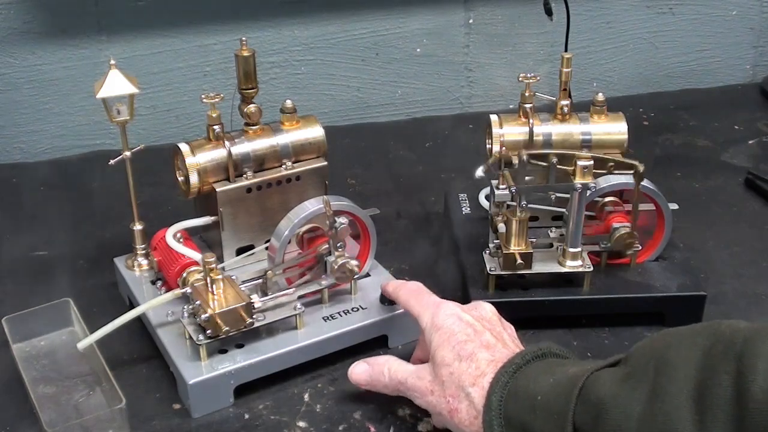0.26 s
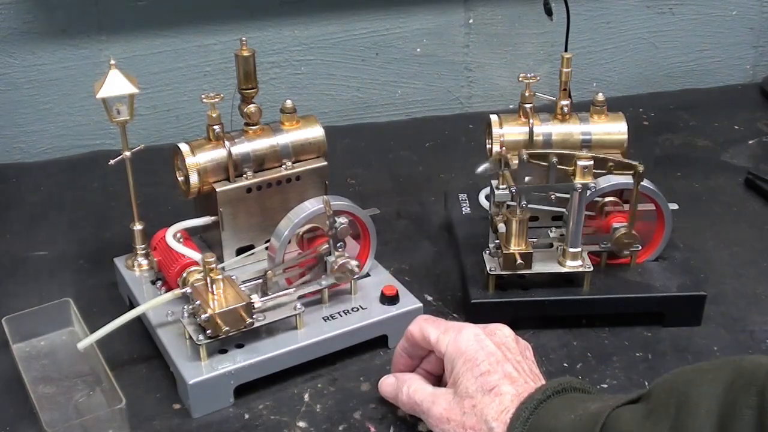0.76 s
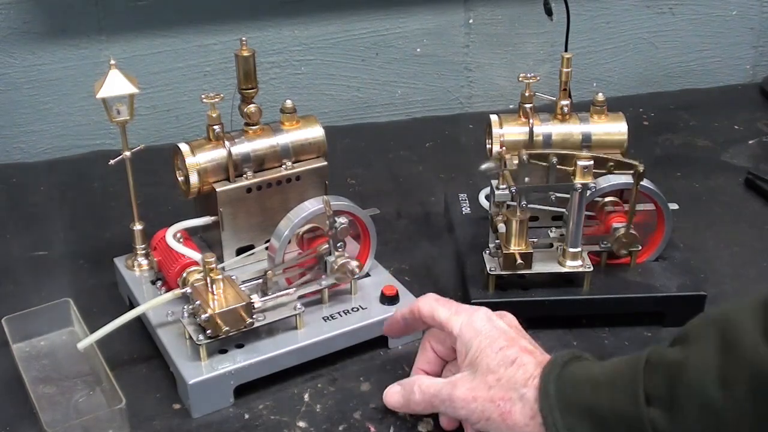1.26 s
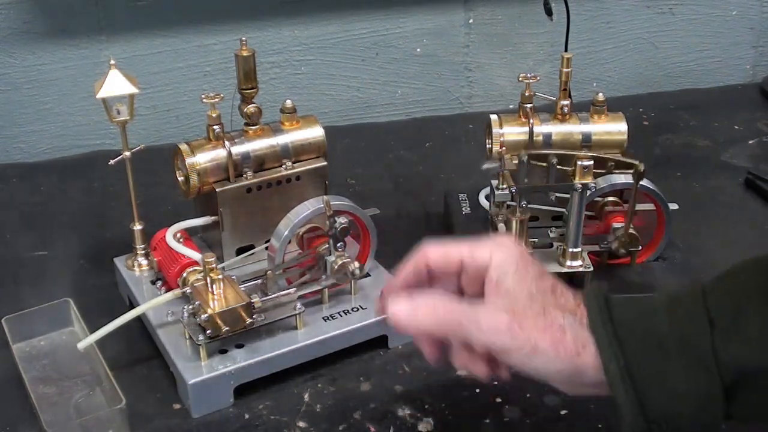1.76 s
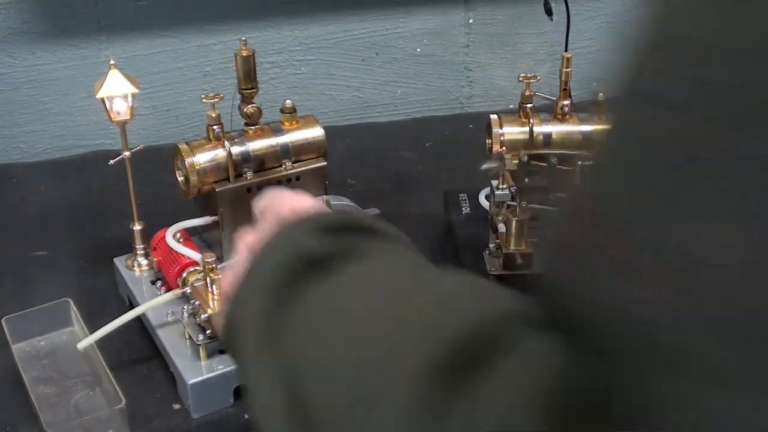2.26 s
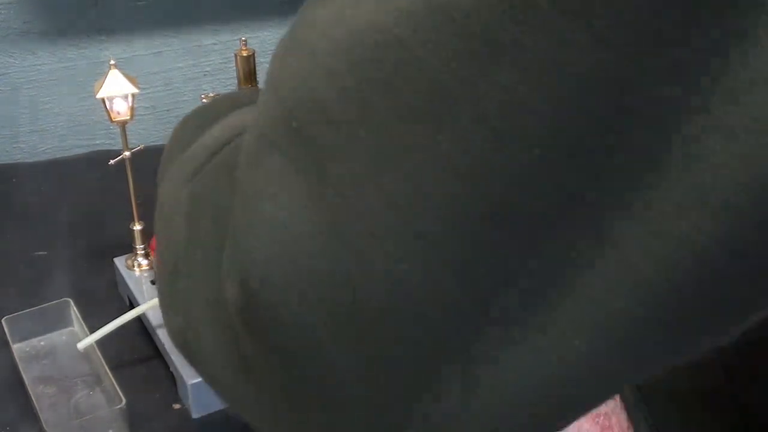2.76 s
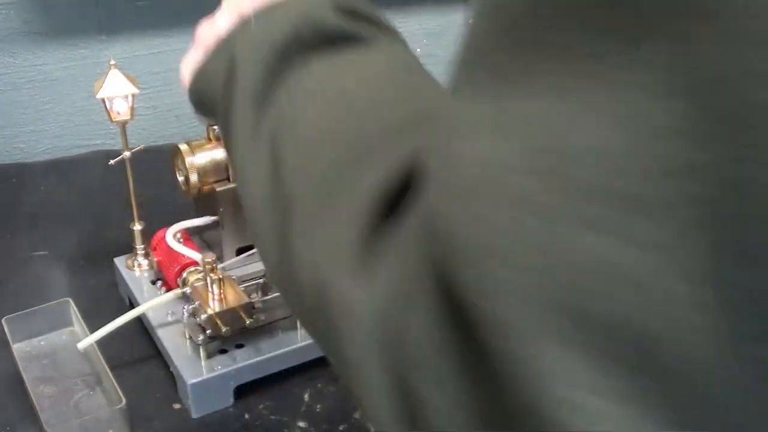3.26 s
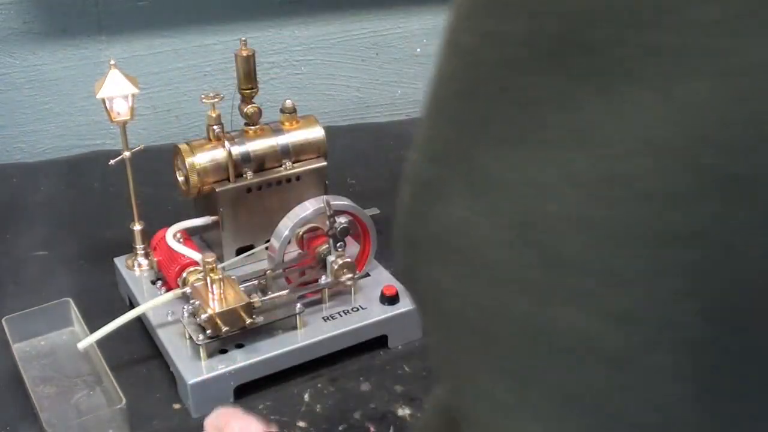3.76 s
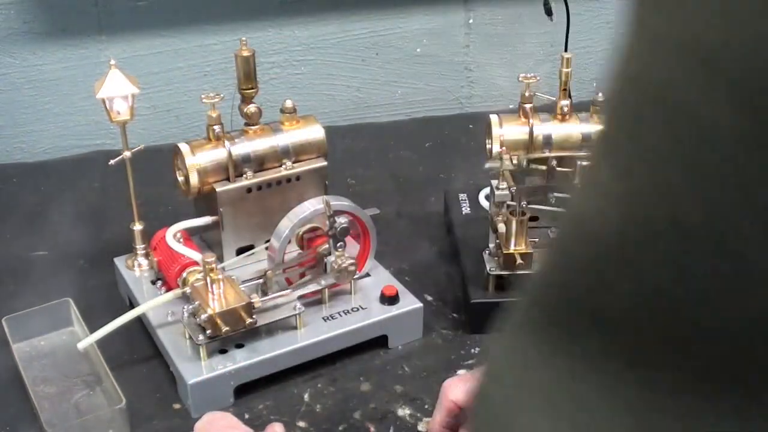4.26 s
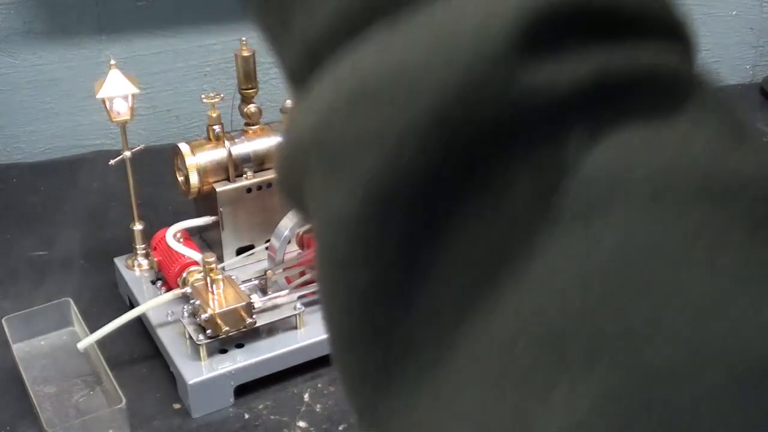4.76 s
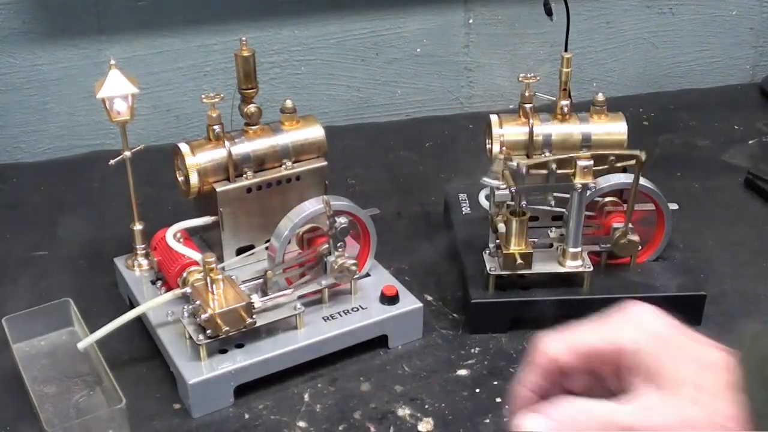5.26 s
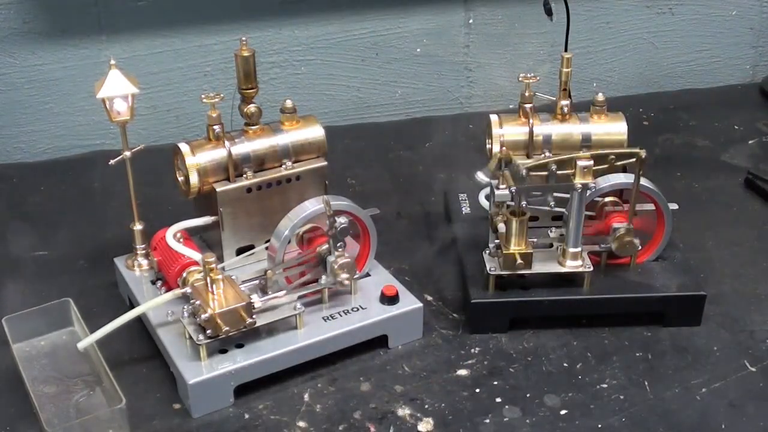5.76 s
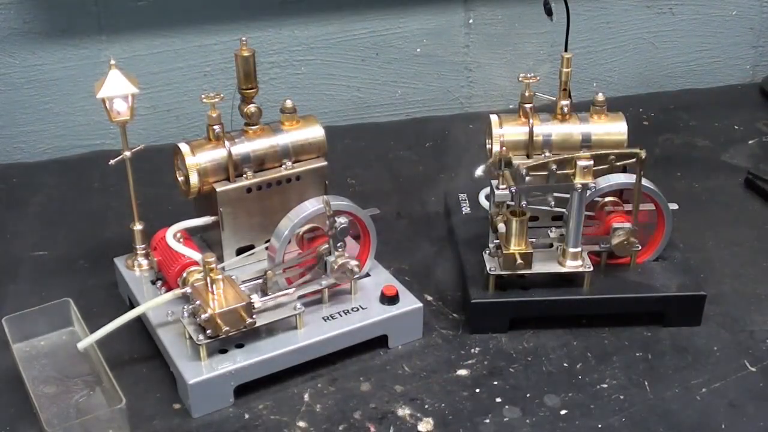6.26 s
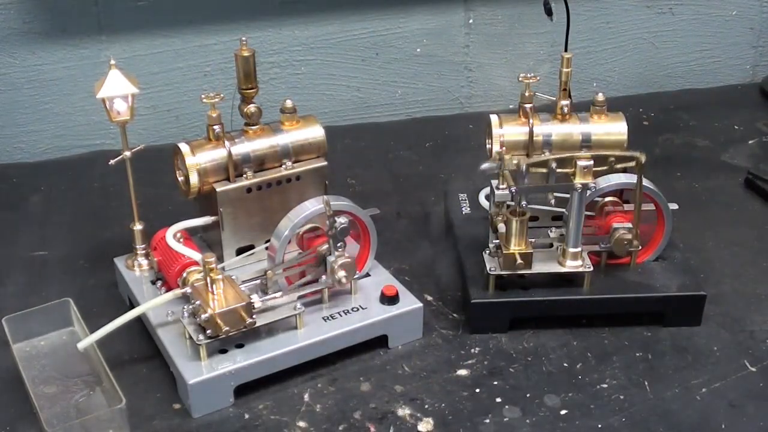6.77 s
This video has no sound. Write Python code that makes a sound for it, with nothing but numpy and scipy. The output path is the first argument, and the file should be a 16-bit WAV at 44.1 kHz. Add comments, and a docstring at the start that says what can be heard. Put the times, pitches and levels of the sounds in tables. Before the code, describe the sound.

Two model steam engines run on a bench in a small workshop, heard close up. One beats quickly and evenly with hollow exhaust puffs, metallic clicks and little thumps, slowing slightly after about two seconds. The other adds a soft, fluttering whirr, and the boilers hiss faintly. A brief spurt of steam comes early, a few stray knocks and clicks fall along the way, and a tiny squeak sounds near the end.

```python
"""Knocks, puffs and thumps repeat over a soft whirr and hiss: two model steam engines, close by on a workbench.
The beam engine slows from eight turns a second to seven; its slack joints excite the modes of linkage and
bench, and each release of steam rings its chimney. The other engine whirrs, swelling with each stroke.
Turbulent leaks make the boilers hiss, things click or get bumped now and then, and an arm reaching across
casts an acoustic shadow in the treble. The small workshop adds brief reflections."""
import sys
import numpy as np
from scipy import signal
from scipy.fft import rfft, irfft
from scipy.io import wavfile

SR = 44100
rng = np.random.default_rng(int(sys.argv[2]) if len(sys.argv) > 2 else 0)


def to_wav(s):
    """Save 16-bit WAV."""
    ch = np.atleast_2d(s).T  # columns
    pcm = np.round(np.clip(ch, -1, 1) * 32767)  # PCM
    wavfile.write(sys.argv[1], SR, pcm.astype(np.int16))


N = 309582
TIME = np.arange(N) / SR
TAIL = TIME[:SR // 4]

# modes of beam, rods and flywheel: frequency_hz, t60_s, level_db
LINKAGE_MODES = [(1382, 0.086, -3.5), (1492, 0.043, -0.5), (1606, 0.055, 5), (1667, 0.058, -2.5),
                 (1805, 0.046, -10), (1883, 0.056, 2.5), (1967, 0.083, 0), (2160, 0.038, -0.5),
                 (2305, 0.037, -7), (2336, 0.14, -5.5), (3000, 0.036, 0.5), (3200, 0.061, -1),
                 (3400, 0.044, -2), (4047, 0.12, -10), (4697, .035, -5.5)]
# modes of the base plate on the bench top: frequency_hz, t60_s, level_db
BENCH_MODES = [(123.7, 0.15, -10), (144, 0.14, -7), (214, 0.18, -7.5), (245, 0.2, -5), (285.4, 0.18, 2.5),
               (323.7, 0.25, -6.5), (382.6, 0.24, -4), (443, 0.15, -5), (479.3, 0.15, -5.5),
               (607, 0.23, -12)]
# spectrum of a steam jet: frequency_hz, density_db
STEAM_SPECTRUM = [(300, -20.5), (900, 2), (2200, 0), (2700, -4.5), (3200, -2), (4800, -4.5), (6500, -10.5),
                  (9000, -10), (12500, -15.5), (16000, -30)]


def undb(db):
    """Amplitude ratio of a level in decibels."""
    return 10 ** (np.asarray(db) / 20)


def unit(response):
    """Normalisation to unit energy."""
    return response / np.sqrt(np.sum(response ** 2))


def through(x, response):
    """Convolution of a signal with an impulse response."""
    return signal.oaconvolve(x, response)[:N]


def curve(points, t=TIME):
    """Linear interpolation between (time, value) points."""
    return np.interp(t, *np.transpose(points))


def fade(t60):
    """Exponential decay of 60 dB in t60 seconds."""
    return np.exp(-np.log(1000) * TAIL / t60)


def modes(table):
    """Superposition of damped modes; alternating signs make the ring take a moment to build."""
    return unit(sum((-1) ** k * undb(db) * fade(t60) * np.sin(2 * np.pi * hz * TAIL)
                    for k, (hz, t60, db) in enumerate(table)))


def colour(points, size=4096):
    """Minimum-phase response with the given spectrum, by folding the cepstrum."""
    hz, db = np.transpose(points)
    bin_hz = np.arange(size // 2 + 1) * SR / size
    gain = undb(np.interp(np.log(bin_hz + 1), np.log(hz), db))
    cepstrum = irfft(np.log(gain))
    cepstrum[1:size // 2] *= 2
    cepstrum[size // 2 + 1:] = 0
    return unit(irfft(np.exp(rfft(cepstrum))))


def noise():
    """White Gaussian noise."""
    return rng.standard_normal(N)


def walk(rate_hz):
    """Interpolated random fluctuation with a spread near 1."""
    return np.interp(TIME * rate_hz, np.arange(N), noise())


def blows(times, db, rough=0., chatter_s=.002):
    """Impulsive excitation; roughness spreads each impact's energy over a chatter of small contacts."""
    out = np.zeros(N)
    shape = np.exp(-TAIL[:SR // 20] / chatter_s)
    for s, gain in zip(times, undb(db)):
        push = rough * unit(shape * rng.standard_normal(len(shape)))
        push[0] += 1
        at = int(s * SR) + np.arange(len(push))
        inside = (at >= 0) & (at < N)
        out[at[inside]] += gain * unit(push)[inside]
    return out


def puffs(times, db, open_s, hold_s, decay_s):
    """Turbulent noise follows the flow: the port opens, holds briefly, and the pressure drains."""
    flow = (1 - np.exp(-TAIL / open_s)) * np.exp(-np.maximum(TAIL - hold_s, 0) / decay_s)
    return through(blows(np.maximum(times, 0), db), flow) * noise()


def pops(times, db, start_hz, end_hz, length_s, skew, scatter):
    """Cavity resonance: gargling pops whose pitch falls as the steam pocket in the pipe grows."""
    out = np.zeros(N + SR)
    gargle = 1 + .45 * (walk(650) + 1j * walk(650))
    for s, gain, (detune, stretch) in zip(times, undb(db), rng.standard_normal((len(times), 2))):
        progress = np.linspace(0, 1, int(SR * length_s * np.exp(0.16 * stretch)))
        hz = start_hz * (end_hz / start_hz) ** progress * (1 + scatter * detune)
        at = max(int(s * SR), 0)
        swing = np.exp(2j * np.pi * np.cumsum(hz) / SR)
        swing *= gargle.take(at + np.arange(len(hz)), mode="clip")
        envelope = np.sin(np.pi * progress ** skew)
        out[at:at + len(hz)] += gain * unit(envelope * swing.imag) * (s > 0)
    return out[:N]


def snap(s, db, centre_hz, width_hz, decay_s):
    """A band-limited transient: bright noise that dies within milliseconds."""
    burst = (TIME >= s) * np.exp(-np.abs(TIME - s) / decay_s) * noise()
    softened = signal.sosfilt(signal.butter(4, 13500, fs=SR, output="sos"), burst)
    band = signal.iirpeak(centre_hz, centre_hz / width_hz, fs=SR)
    return undb(db) * np.sqrt(SR / 2 / width_hz) * signal.lfilter(*band, softened)


def rumble():
    """Low room noise; a deep part in antiphase makes the two ears differ."""
    # workshop background: frequency_hz, density_db
    spectrum = [(20, -9), (40, -16), (55, 2), (70, 3), (85, -4), (120, -24), (400, -47)]
    common = undb(-71.5) * through(noise(), colour(spectrum, size=16384))
    deep = undb(-83) * through(noise(), colour([(20, 0), (45, -6), (200, -40)], size=16384))
    return np.array([common + deep, common - deep])


def workshop(x, t60=0.22, build_s=0.0039):
    """Diffuse reverberation of a cluttered room, thinner and duller than the direct sound."""
    tail = rng.standard_normal(len(TAIL)) * fade(t60) * (1 - np.exp(-TAIL / build_s))
    return through(signal.lfilter(*signal.butter(1, [500, 7000], "band", fs=SR), x), unit(tail))


def early_reflections(x, t60=0.048):
    """Scattering off the boilers and the bench gives a very short tail."""
    return through(x, unit(rng.standard_normal(len(TAIL)) * fade(t60)))


def direct_path(x, shadow_hz=9500, bass_hz=100):
    """An arm's acoustic shadow varies the treble, and such small bodies radiate almost no bass."""
    # treble gain as the arm moves: time_s, gain_db
    shadow = [(2.2, 2), (2.42, -2.5), (3.15, -2), (3.6, 3.5), (4.5, 3.5), (4.75, 0), (5.05, 4)]
    low = signal.sosfiltfilt(signal.butter(5, shadow_hz, fs=SR, output="sos"), x)
    shaded = low + (x - low) * undb(curve(shadow))
    return signal.sosfilt(signal.butter(8, bass_hz, "high", fs=SR, output="sos"), shaded)


def mill_engine(turn_hz=24, throb_db=2.0):
    """Amplitude modulation: the whirr of the fast, light horizontal engine swells with each stroke."""
    # running noise: frequency_hz, density_db
    whirr = [(80, -14.5), (110, 2.5), (200, 2.5), (290, 10.5), (430, 0.5), (580, -4), (900, 1.5),
             (1700, -7.5), (2700, -10), (3300, -6), (6000, -12.5), (12000, -42)]
    turns = np.cumsum(turn_hz * (1 + 0.024 * walk(1.88))) / SR
    running = noise() * undb(throb_db * np.cos(2 * np.pi * turns) + 0.5 * walk(40))
    return undb(-43) * through(running, colour(whirr)) + undb(-57) * through(running, modes(LINKAGE_MODES))


def boilers():
    """Jet noise: leaking steam sizzles, and once a gush of wet steam joins it."""
    # strength of the leak: time_s, relative_level_db
    leak = [(0, -40.5), (1.4, -37.5), (2.1, -37.5), (2.5, -40), (4.1, -40.5), (4.85, -39), (5.16, -37.5),
            (7.02, -37.5)]
    # spectrum of the leak: frequency_hz, density_db
    hiss_spectrum = [(2500, -1), (4500, -9.5), (6300, -7.5), (7700, 1.5), (8900, 1.5), (9600, 0),
                     (10900, 3), (12200, -6), (14000, -11.5), (16000, -16)]
    # a gush of wet steam: time_s, level_db
    gush_levels = [(1.34, -45), (1.37, -35.5), (1.44, -33.5), (1.49, -43), (1.54, -68)]
    hiss_db = curve(leak) + 0.55 * walk(25) + 0.93 * walk(600) - 3.0
    hiss = through(noise() * undb(hiss_db), colour(hiss_spectrum))
    gush = through(noise() * undb(curve(gush_levels)), colour(STEAM_SPECTRUM))
    return hiss + gush


def stray_clicks():
    """Noise transients: two short bright clicks, the first probably a switch being released."""
    # the clicks: start_s, level_db, centre_hz, width_hz, decay_s
    clicks = [(.288, -25, 7250, 4940, 0.004), (5.604, -23, 13500, 2400, 0.0016)]
    return sum(snap(*click) for click in clicks)


def squeak():
    """Friction makes a dry bearing sing for a moment."""
    # course of the squeak: time_s, pitch_hz, level_db
    glide = [(6.821, 6460, -65), (6.858, 6430, -50), (6.88, 6080, -47), (6.932, 6030, -45),
             (6.98, 5900, -58)]
    s, hz, db = np.transpose(glide)
    cycles = np.cumsum(np.interp(TIME, s, hz) * (1 + 0.0092 * walk(220))) / SR
    envelope = undb(np.interp(TIME, s, db) + 2 * walk(60)) * (TIME > s[0]) * (TIME < s[-1])
    return envelope * np.sin(2 * np.pi * cycles)


def bumps():
    """Stray impacts snap at the contact and set bench, metalwork and base plates in free vibration."""
    # knocks on bench and frames: start_s, thump_db, ring_db, clack_db, snap_db, snap_hz
    knocks = [(0.115, -28, -4, -16, -23.5, 7200), (1.309, -12, -9, -1.5, -22, 4040),
              (1.919, -1, -24, -11, -24, 7200), (1.938, -3, -30, -17, -50, 4000),
              (3.816, -6, -27, -3, -48, 4000), (5.1, -4.5, -6, -8, -22.5, 3500),
              (6.88, -32, -4.5, -10.5, -25.5, 3970)]
    # dull clack of a base plate: frequency_hz, density_db
    clack_spectrum = [(200, -20), (420, 0), (900, 5), (2200, -10), (3500, -23), (5500, -10), (9000, -14),
                      (16000, -45)]
    s, thump_db, ring_db, clack_db, snap_db, snap_hz = np.transpose(knocks)
    thump = through(blows(s, thump_db, rough=0.26, chatter_s=0.0053), modes(BENCH_MODES))
    ring = through(blows(s, ring_db, rough=0.86, chatter_s=0.003), modes(LINKAGE_MODES))
    contact = sum(snap(*hit, width_hz=8900, decay_s=0.0058) for hit in zip(s, snap_db, snap_hz))
    clack = through(blows(s, clack_db, rough=7.5, chatter_s=0.0095), colour(clack_spectrum))
    return contact + thump + ring + clack


def gulp():
    """Cavity resonance: a slug of condensed water glugs in the exhaust pipe."""
    # the slug: start_s, level_db
    slugs = [(3.814, -5.5)]
    s, db = np.transpose(slugs)
    return pops(s, db, start_hz=677, end_hz=354, length_s=0.0237, skew=1.3, scatter=.01)


def flywheel(first_turn_s=-0.0165):
    """Speed integrates to rotation: each turn gets a start time and knock, exhaust and click drives."""
    # speed of the beam engine: time_s, turns_per_s
    speed = [(0.0, 8.014), (1.8, 7.9162), (2.4, 7.4291), (2.6, 7.4169), (3.2, 7.0725), (4.4, 6.9549),
             (4.6, 6.9755), (7.02, 6.8644)]
    # how hard it works: time_s, force_db, click_db
    effort = [(0, -2, -8.5), (.36, -5.5, -.5), (.75, 2.3, 1), (1.35, 2.5, 4), (1.6, 0, 1.5), (2.12, 3, 3),
              (2.5, -1.7, -1), (3.6, 0.3, -4.5), (3.92, -3, -4.5), (4.6, 1.2, -2), (5.22, -.3, -.5),
              (5.9, 2, 1.5), (6.95, -5.5, 0)]
    t = first_turn_s + TIME
    turns = np.cumsum(curve(speed, t)) / SR
    s = np.interp(np.arange(turns[-1]), turns, t)
    when, force_db, click_db = np.transpose(effort)
    stroke_db = np.interp(s, when, force_db)
    # no two strokes are alike
    knock_jitter, exhaust_jitter, click_jitter = rng.standard_normal((len(s), 3)).T
    knock_db = 1.1 + 1.05 * stroke_db + 1.5 * knock_jitter
    exhaust_db = -1.42 + 0.53 * stroke_db + 0.47 * exhaust_jitter
    return s, knock_db, exhaust_db, np.interp(s, when, click_db) + 0.1 * click_jitter


def valve(beats):
    """The slide valve's high modes are struck at each reversal and blown by steam on both strokes."""
    # modes of the small valve gear: frequency_hz, t60_s, level_db
    gear_modes = [(6750, 0.024, -3), (7700, 0.02, 5.5), (8460, 0.075, -1), (8900, 0.05, 4),
                  (9040, 0.035, 1), (12900, .03, -10), (12800, .012, -4)]
    return_modes = [(7430, 0.0031, 0), (8250, .003, -1), (8920, 0.0064, 0)]
    s, _, _, click_db = beats
    return_s = s + .53 * np.gradient(s)
    return_tick = blows(return_s, 0.47 * click_db - 13.0, rough=2.3, chatter_s=0.0022)
    ticks = blows(s, click_db - 14, rough=0.99, chatter_s=0.003) + 0.45 * return_tick
    strokes = np.concatenate([s, return_s])
    leak = puffs(strokes, np.full(len(strokes), -49), open_s=0.016, hold_s=0.0086, decay_s=0.027)
    return through(ticks + leak, modes(gear_modes)) + through(return_tick, modes(return_modes))


def crack(beats):
    """Sudden pressure release: each chuff starts with a short crack as the exhaust port opens."""
    # first crack of steam: frequency_hz, density_db
    spectrum = [(1000, -33), (3000, 5), (5000, 4), (6500, -9), (9000, -2), (11000, -1.5), (13200, -3),
                (14500, -12), (16000, -15)]
    s, _, _, click_db = beats
    release = blows(s + .0012, 1.34 * click_db - 13.0, rough=3.4, chatter_s=0.0024)
    return through(release, colour(spectrum))


def exhaust(beats):
    """Pipe resonance: one chuff a turn, a bright pop sinking to a hollow one; the return stroke sighs."""
    # modes of exhaust pipe and chimney: frequency_hz, t60_s, level_db
    chimney_modes = [(660, 0.022, -9), (854.6, 0.074, -1.8), (900, 0.041, -3.5), (964, 0.081, -8),
                     (1143.7, 0.075, 0.5), (1206, 0.022, -2), (1343, 0.041, -11), (1446, 0.029, -3.5),
                     (1606, 0.049, -4), (1977, 0.035, -6.5)]
    s, knock_db, exhaust_db, click_db = beats
    turn_s = np.gradient(s)
    pop = pops(s - .0035, knock_db - 4.5, 1680, 1573, length_s=0.012, skew=1.25, scatter=0.022)
    pop += pops(s + 0.004055, exhaust_db - 5.5, 1160, 1139, length_s=0.031, skew=0.35, scatter=0.02)
    pop += pops(s + .015, exhaust_db - 8, 937, 828, length_s=0.017, skew=0.33, scatter=0.045)
    chuff = puffs(s, exhaust_db, open_s=0.0021, hold_s=0.014, decay_s=0.019)
    sigh = puffs(s + 0.499 * turn_s, exhaust_db, open_s=0.0017, hold_s=0.011, decay_s=0.0027)
    surge = blows(s + 0.004006, exhaust_db - 4.5, rough=0.48, chatter_s=0.0055)
    chimney = through(undb(-32.5) * chuff + undb(-37.5) * sigh + surge, modes(chimney_modes))
    jet = puffs(s, 0.46 * click_db, open_s=0.0078, hold_s=0.011, decay_s=0.028)
    steam = through(undb(-33) * jet + undb(-45.0) * sigh, colour(STEAM_SPECTRUM))
    # the barely open port whistles just before the return stroke
    seep = puffs(s + 0.405 * turn_s, .5 * click_db - 44.0, open_s=0.0027, hold_s=0.015, decay_s=0.0036)
    whistle = through(seep, modes([(3310, 0.011, 0)]))
    return pop + chimney + steam + whistle


def clatter(beats):
    """Backlash: slack joints collide several times a turn, exciting the modes of linkage and bench."""
    # contacts in each turn: turn_fraction, ring_db, tick_db, thump_db, scatter_s
    contacts = [(0, -10.5, -10.5, -14.5, 0.000042), (.022, -5.5, -12.5, -7, 0.00027),
                (.115, -10, -10.5, -8.5, .001), (.29, -30, -56, -11.5, 0.0015),
                (.58, -17, -31, -17, 0.0029), (.92, -20, -39, -12, 0.0026)]
    # click of a joint: frequency_hz, density_db
    click_spectrum = [(500, -23.5), (1500, 16.5), (2600, 2.5), (4500, -0.5), (6500, -11), (9000, 4.5),
                      (12500, -1), (16000, -12)]
    s, knock_db, exhaust_db, click_db = beats
    turn_s = np.gradient(s)
    ring, click, thump = 0, 0, 0
    for fraction, ring_db, tick_db, thump_db, scatter_s in contacts:
        at = s + fraction * turn_s + scatter_s * rng.standard_normal(len(s))
        uneven_db = rng.standard_normal(len(s))
        ring += blows(at, 0.77 * knock_db + ring_db + uneven_db, rough=1.0, chatter_s=0.0059)
        click += blows(at, click_db + tick_db + uneven_db, rough=1.25, chatter_s=0.006)
        thump += blows(at, 0.55 * exhaust_db + thump_db + uneven_db, rough=0.43, chatter_s=0.0082)
    metal = through(ring, modes(LINKAGE_MODES)) + through(click, colour(click_spectrum))
    return metal + through(thump, modes(BENCH_MODES))


def scene():
    """Mid-side stereo: a level difference leans the midrange left, and reflections add slight width."""
    # reflected sound that differs between left and right: frequency_hz, level_db
    width = [(100, 2), (300, -1), (700, 14), (2000, -9), (4500, 0), (7500, 13.5), (10000, 4.5), (14000, -8)]
    beats = flywheel()
    sources = [clatter(beats) + bumps(), exhaust(beats) + gulp(), mill_engine(),
               boilers() + stray_clicks(), valve(beats) + crack(beats) + squeak()]
    arrivals = [direct_path(x) for x in sources]
    direct = sum(arrivals)
    midrange = signal.lfilter(*signal.butter(1, [150, 2200], "band", fs=SR), direct)
    lean = (undb(1.08) - 1) * midrange
    mid = direct + undb(-12.0) * workshop(direct)
    scattered = through(sum(early_reflections(x) for x in arrivals), colour(width))
    side = lean + undb(-22.5) * scattered + undb(-31.5) * workshop(direct)
    return np.array([mid + side, mid - side]) + rumble()


def record(dry, top_hz=15850):
    """Band limiting: a steep low-pass filter cuts the highest treble."""
    return signal.sosfilt(signal.ellip(12, .2, 80, top_hz, fs=SR, output="sos"), dry)


dry = scene()
out = record(dry)
to_wav(out)
```